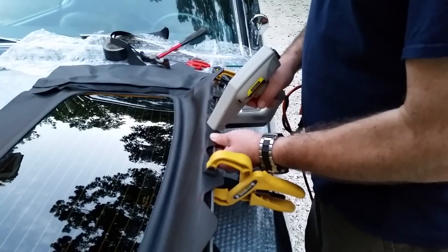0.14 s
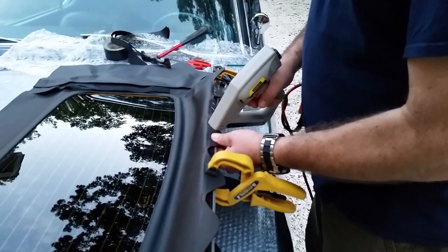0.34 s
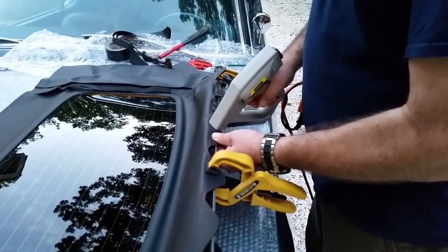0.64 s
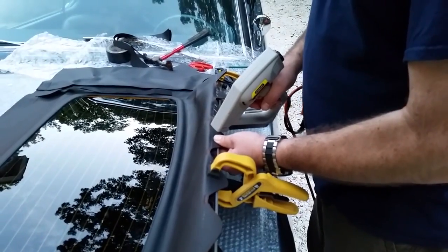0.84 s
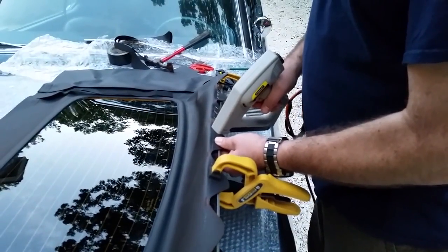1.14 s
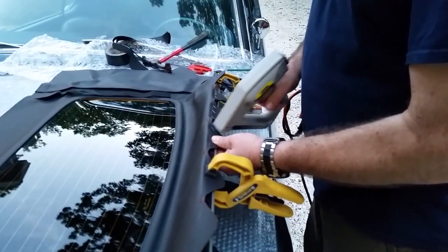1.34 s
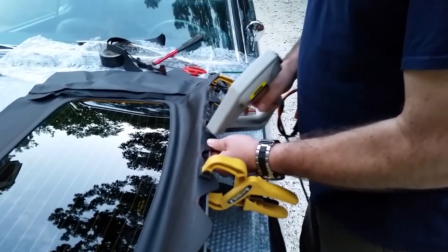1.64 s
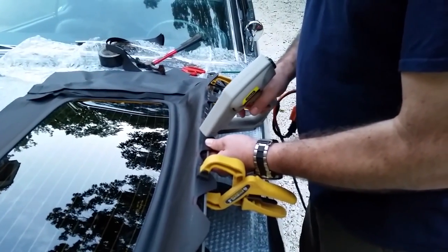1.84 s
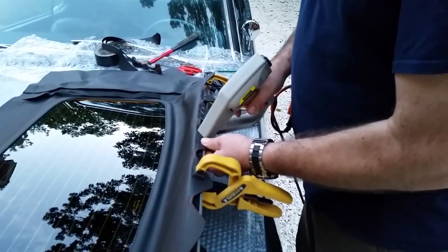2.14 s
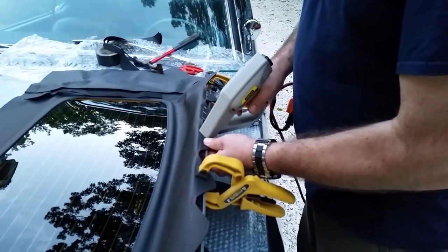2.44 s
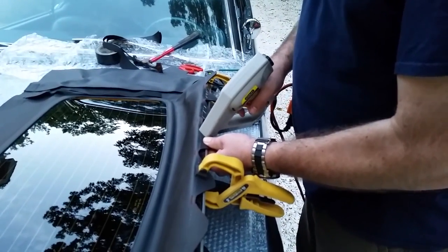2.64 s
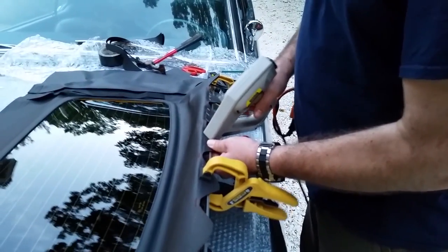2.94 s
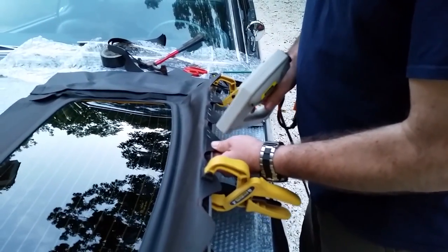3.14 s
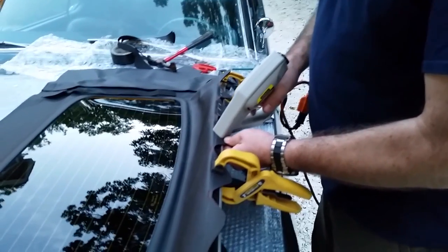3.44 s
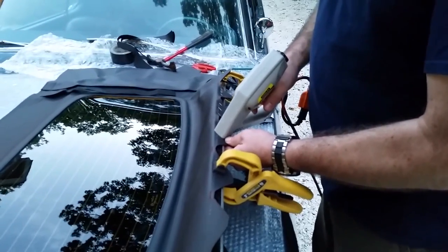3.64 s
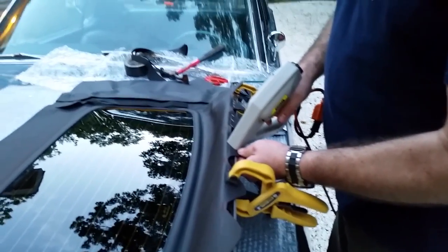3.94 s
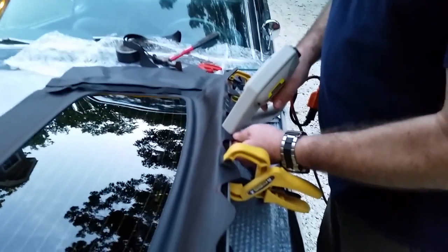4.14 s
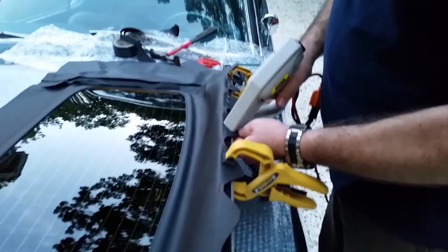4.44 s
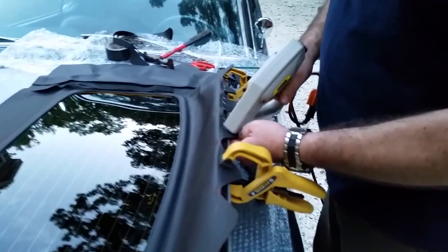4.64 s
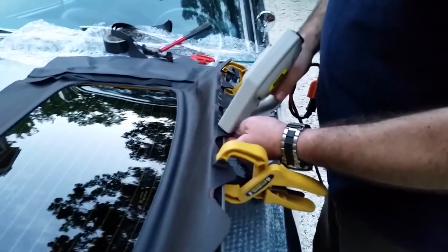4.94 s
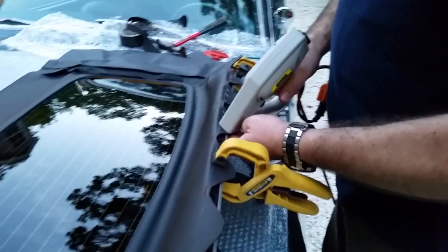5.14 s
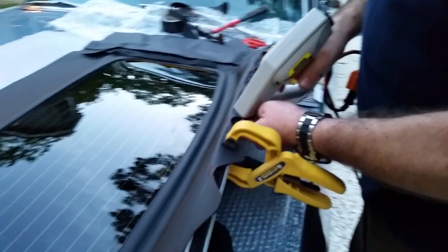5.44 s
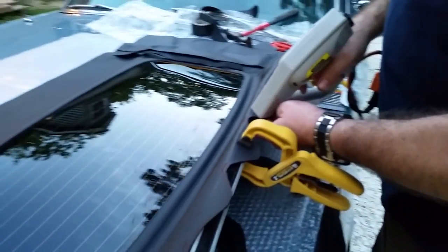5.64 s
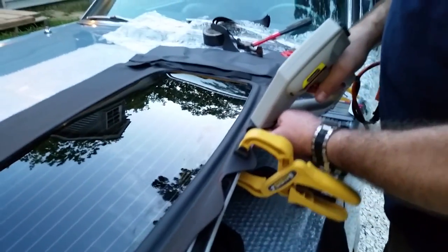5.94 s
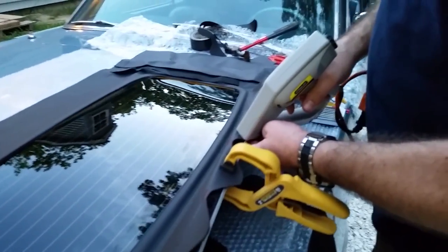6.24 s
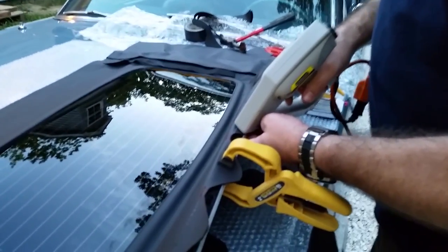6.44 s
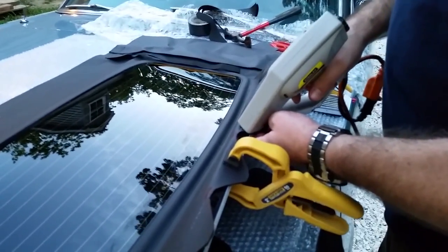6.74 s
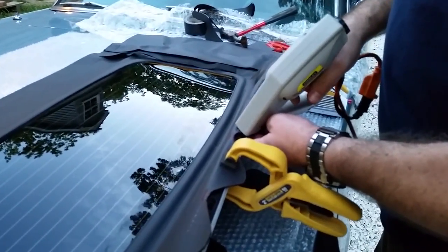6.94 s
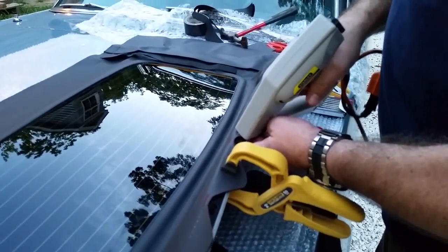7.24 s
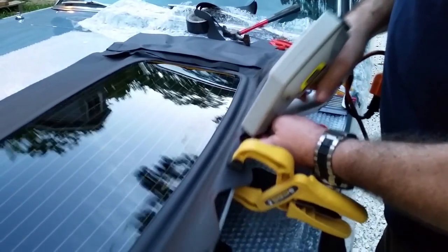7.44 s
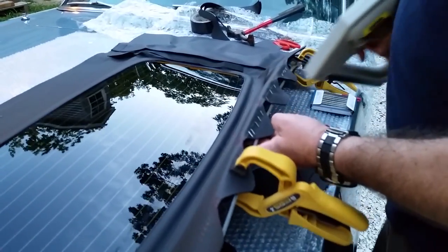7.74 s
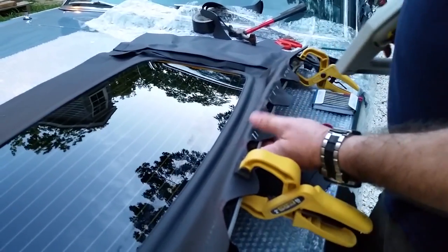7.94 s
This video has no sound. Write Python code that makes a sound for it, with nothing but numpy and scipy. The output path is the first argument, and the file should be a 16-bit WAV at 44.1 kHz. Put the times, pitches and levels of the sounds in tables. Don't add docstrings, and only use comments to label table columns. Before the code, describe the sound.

Small plastic clicks and vinyl rubbing lead into five explosive stapler shots spaced roughly one and a half seconds apart. The first two leave a low hollow panel boom; the later ones are drier and more rattly, the fourth with several rebounds. Faint traffic rumble and a fluttering cricket lie beneath. Close stereo phone sound in open air, distorted peaks, with a noise gate pumping the quiet parts.

```python
import sys
import numpy as np
from scipy import signal
from scipy.fft import rfft, irfft, next_fast_len
from scipy.io import wavfile
from scipy.ndimage import uniform_filter1d

SR = 44100
rng = np.random.default_rng(int(sys.argv[2]) if len(sys.argv) > 2 else 0)


def master_out(mix):
    frames = np.transpose(np.atleast_2d(mix))
    ceiling = np.clip(frames, -1, 1)
    pcm = np.round(ceiling * 32767).astype(np.int16)
    wavfile.write(sys.argv[1], SR, pcm)


def ratio_of_db(decibels):
    return 10 ** (np.asarray(decibels, float) / 20)


N = 357142
T = np.arange(N) / SR


def on_log_hz(table, hz):
    f, v = np.transpose(table)
    return np.interp(np.log(hz), np.log(f), v)


# (frequency [Hz], correlation)
LIKENESS = [(60, 0.18), (300, 0.15), (700, 0.61), (1400, 0.0022), (15000, 0.012)]


def noise(colour, size, like=1.0):
    fast = next_fast_len(size, real=True)
    hz = np.maximum(np.fft.rfftfreq(fast, 1 / SR), 1)
    inside = (hz >= colour[0][0]) & (hz <= colour[-1][0])
    c = np.clip(like * on_log_hz(LIKENESS, hz), 0, .98)
    shape = ratio_of_db(on_log_hz(colour, hz)) * inside
    mid, side = rfft(rng.standard_normal((2, fast))) * shape * np.sqrt([1 + c, 1 - c])
    x = irfft([mid + side, mid - side], fast)[:, :size]
    return x / x.mean(axis=0).std()


def grain(size, hold):
    return uniform_filter1d(np.repeat(rng.standard_normal(size // hold), hold), hold)


def walk(rate):
    k = int(SR / rate)
    return grain(N + k, k)[:N]


def ring(hz, t60, size, rise=.0005):
    t = np.arange(size) / SR
    return np.sin(2 * np.pi * hz * t) * ratio_of_db(-60 * t / t60) * (1 - np.exp(-t / rise))


def lean(db):
    return ratio_of_db(db * np.array([[.5], [-.5]]))


def add(out, s, x):
    i = int(s * SR)
    out[:, i:i + x.shape[-1]] += x[..., :N - i]


# (depth [dB], shutting [s], reopens at [s], opening [s])
GATE = [
    (-22.5, 0.29, 2.29, 0.54),
    (-22.5, 0.2, 3.935, 0.385),
    (-20.5, 0.13, 5.57, 0.41),
    (-16, 0.43, 6.888, 0.49),
    (-18.5, 0.27, 8.5, .3),
]


def gate_db(lag):
    out = 0
    for (s, *_), (depth_db, shutting, reopens, opening) in zip(SHOTS, GATE):
        up = np.clip((T - reopens - lag) / opening, 0, 1)
        shut = 1 - np.exp(-(np.maximum(T - s, 0) / shutting) ** 2)
        out = out + depth_db * shut * (1 + np.cos(np.pi * up)) / 2
    return out


# (time [s], level [dB])
EFFORT = [(0, 6.5), (.13, -2), (1.25, 0), (2.3, -5), (2.9, -1.5), (3.45, 7.5), (3.97, -8.5), (4.12, 6),
          (4.35, 6), (4.9, 6), (5.4, 0.5), (5.65, 6.5), (5.95, 7.5), (6.6, 7.5), (6.95, 5.5), (7.2, 6),
          (7.42, 10), (8.09, 7.5)]


def gated(mix, colours, flicker_db, rate):
    effort = np.interp(T, *np.transpose(EFFORT))
    layers = []
    for (db, gate, work, lag), colour, f, r in zip(mix, colours, flicker_db, rate):
        level_db = db + gate * gate_db(lag) + work * effort + f * walk(r)
        layers.append(noise(colour, N) * ratio_of_db(level_db))
    return layers


# (frequency [Hz], level [dB per Hz])
RUMBLE = [(12, -39.5), (20, -7), (27, -7.5), (108, -4), (236, -15), (260, -21), (340, -50), (570, -120)]
ROAD = [(290, -41.5), (500, -8), (590, -7), (770, 2), (960, 1.5), (1500, -17.5), (1950, -59), (3300, -120)]
INSECTS = [(3300, -30.5), (3800, -6), (4300, -2.5), (4600, -4), (5300, -22.5), (6100, -19), (6900, -21),
           (7300, -46)]
# (level with the gate open [dB], share of gate depth, share of effort, reopening lag [s])
YARD_MIX = [
    (-53.5, 0.53, 0.6, -0.084),
    (-60.5, 0.8, 0.82, -0.058),
    (-67.5, 1.12, .01, -0.011),
    (-76.5, 0.71, .01, -0.019),
]


def yard():
    return sum(gated(YARD_MIX[:3], [RUMBLE, ROAD, INSECTS], flicker_db=[1.5, 1.0, 1.0], rate=[14, 25, 60]))


# (frequency [Hz], level [dB per Hz])
CRICKET = [(1, 1.5), (60, -3), (130, -7.5), (400, -27.5)]
# (time [s], pitch [Hz])
CRICKET_HZ = [(0.0, 4640), (0.4, 4540), (0.61, 4790), (0.9, 4670), (4.8, 4650), (4.87, 4780), (5.41, 4620),
              (6.08, 4740), (6.81, 4570), (7.12, 4810), (7.46, 4590), (7.55, 4900), (7.8, 4670),
              (8.09, 4670)]
# (middle [s], half length [s], swell [dB])
PHRASES = [(0, .1, 13.5), (0.821, .32, 13), (2.42, 0.22, 11), (2.825, 0.11, 2), (3.797, 0.24, 7),
           (4.492, 0.21, 6.5), (5.686, .15, 11.5), (5.98, 0.14, 12.5), (7.083, .08, 8.5), (7.346, 0.096, 6),
           (7.78, 0.065, 6)]


def cricket():
    flutter = gated(YARD_MIX[3:], [CRICKET], flicker_db=[1.5], rate=[150])[0]
    hz = np.interp(T, *np.transpose(CRICKET_HZ))
    swell_db = sum(db * np.exp(-((T - s) / half) ** 2) for s, half, db in PHRASES)
    return flutter * 1.7 * np.cos(2 * np.pi * np.cumsum(hz) / SR) * ratio_of_db(swell_db)


# (frequency [Hz], level [dB per Hz])
THRUM = [(200, -12), (260, 0), (450, -7), (600, -22)]
CREAK = [(1250, -15), (1600, -1.5), (2400, -2), (3400, -12.5), (3900, -31)]
HISS = [(7000, -26), (7700, -1.5), (8300, -1.5), (10300, -3.5), (11000, -25)]
TOP_HISS = [(10000, -36), (10800, -9), (12100, 2), (14000, -0.5), (14700, -4.5)]
# (level with the gate open [dB], share of gate depth, share of effort, reopening lag [s])
RUB_MIX = [
    (-66.5, 0.85, 0.63, -0.12),
    (-77.5, 0.71, 1, 0.089),
    (-97, 0.0093, 0.43, .01),
    (-84.5, 0.49, .3, .12),
]


def rubbing():
    return sum(gated(RUB_MIX, [THRUM, CREAK, HISS, TOP_HISS], flicker_db=[1.5, 1.0, 1.5, 1.0],
                     rate=[30, 60, 70, 60]))


# (frequency [Hz], level [dB per Hz])
FLOOR = [(12, -28.5), (20, -7), (43, -6.5), (127, -5), (426, -31.5), (872, -21.5), (1210, -38),
         (4080, -38.5), (14500, -43.5)]


def floor():
    return noise(FLOOR, N) * ratio_of_db(-75)


# (middle [s], half length [s], from [Hz], to [Hz], level [dB])
SCUFFS = [
    (0.018, 0.028, 6500, 6750, -59),
    (4.107, 0.084, 490, 2210, -66),
    (4.198, 0.044, 507, 3420, -51.5),
    (4.202, 0.037, 1940, 2680, -56.5),
    (4.196, 0.038, 12300, 14540, -64),
    (5.079, 0.02, 491, 1600, -69),
    (5.087, 0.023, 8330, 14850, -67.5),
    (5.157, 0.021, 757, 1060, -55),
    (5.159, 0.026, 8000, 14800, -75),
]
# (middle [s], half length [s], from [Hz], to [Hz], level [dB])
PALM = [(0.005, 0.073, 11000, 14600, -74), (0.855, .21, 14000, 14400, -85),
        (1.136, 0.094, 1650, 3120, -72.5), (1.145, .085, 11200, 14730, -76.5),
        (2.405, 0.22, 41.8, 153, -58.5), (2.902, 0.14, 11400, 14450, -83), (3.44, 0.0046, 245, 756, -62),
        (3.579, 0.085, 224, 620, -67), (3.997, 0.083, 61.2, 254, -49.5), (4.074, 0.077, 240, 900, -54),
        (4.135, 0.12, 12400, 14680, -76.5), (4.236, 0.042, 231, 500, -45.5),
        (4.273, 0.092, 1549, 2852, -67.5), (4.32, 0.11, 12100, 14760, -76.5),
        (4.524, 0.089, 11620, 14600, -75), (5.161, 0.035, 286.7, 610, -69),
        (5.779, 0.12, 11150, 14600, -74), (5.781, 0.13, 7680, 10400, -84), (5.962, .085, 10900, 14600, -74),
        (5.977, 0.082, 1520, 3064, -69), (6.363, 0.13, 1233, 2690, -68), (5.927, 0.061, 6300, 10000, -79),
        (6.603, 0.023, 297, 1200, -58), (6.636, 0.014, 397, 1500, -58.5), (7.27, .12, 1305, 2900, -70.5),
        (7.23, 0.18, 910, 1160, -59.5), (6.477, 0.15, 7690, 10500, -85), (7.387, .065, 10760, 14700, -76),
        (7.394, 0.06, 1250, 3050, -66), (7.763, 0.11, 9300, 14400, -76.5)]


def scuffs():
    out, t = np.zeros((2, N)), np.arange(-12288, 12288) / SR
    for s, half, low_hz, high_hz, db in list(SCUFFS) + list(PALM):
        band = [(.8 * low_hz, -25), (low_hz, 0), (high_hz, -9), (1.4 * high_hz, -35)]
        level_db = db - 0.5 + 3.4 * grain(len(t), 128)
        swell = noise(band, len(t)) * np.exp(-(t / half) ** 2.0) * ratio_of_db(level_db)
        skip = max(int(-(s + t[0]) * SR) + 1, 0)
        add(out, s + t[skip], swell[:, skip:])
    return out


# (time [s], level [dB], pitch [Hz])
BUMPS = [(0.008, -36.5, 83), (0.92, -44, 165), (1.917, -45, 104), (1.962, -50, 94), (2.257, -66.5, 107),
         (2.358, -66, 125), (2.46, -50, 109), (2.568, -48, 163), (3.44, -45.5, 81.5), (3.6, -42, 99),
         (3.959, -46, 102.2), (4.237, -29.5, 145), (5.206, -52, 95), (5.662, -52, 119.7), (7.304, -33, 103)]


def bumps():
    out = np.zeros((2, N))
    for s, db, hz in BUMPS:
        thud = ring(hz, 4.5 / hz, 4096, rise=.002) + .4 * ring(3.5 * hz, .02, 4096, rise=.002)
        add(out, s, ratio_of_db(db + 5.5) * thud)
    return out


# (time [s], level [dB], ring [Hz], knock [dB], sizzle [dB])
TICKS = [(0.0478, -49, 2500, -40.5, -58), (0.461, -56, 1000, -55, -85), (1.069, -51, 2450, -52, -78),
         (1.1125, -39.5, 2520, -44, -41), (1.9619, -59, 2500, -65, -87), (2.7344, -94, 4154, -69, -59.5),
         (3.5748, -62.5, 2510, -74, -65), (4.2508, -37, 3600, -40, -38), (4.178, -50, 1420, -38, -72),
         (4.238, -30.5, 790, -64, -70), (4.2994, -55, 4720, -52, -62), (4.3994, -59, 4716, -51, -66),
         (5.0695, -55, 1000, -72, -75), (5.183, -60, 1206, -70.5, -78), (5.5815, -62.5, 2000, -50, -53.5),
         (5.6444, -80, 4700, -57, -62), (5.66, -72, 1500, -50, -70), (5.7009, -71, 4760, -40, -67),
         (5.8082, -50, 1536, -34.5, -50.5), (5.8661, -63, 4700, -41, -62), (5.9204, -51.5, 1420, -35, -59),
         (6.6266, -57, 2500, -25.5, -50), (6.8723, -59.5, 2540, -48, -76), (7.272, -44, 996, -43, -77.5),
         (7.6864, -54, 1906, -74, -45.5)]
TRIGGER = [(1.233, -53.5, 4413, -60.5, -58), (2.919, -54, 3050, -66, -63), (2.938, -42, 2780, -52, -39.5),
           (2.955, -55, 1582, -58, -60.5), (4.497, -60, 4500, -53.5, -59.5), (4.514, -50, 2436, -57.5, -53),
           (4.529, -40.5, 4060, -50.5, -39), (6.009, -34, 2900, -43.5, -32), (6.021, -47.5, 4000, -46, -42),
           (7.3936, -41, 1990, -34.5, -55.5), (7.4112, -36.5, 4440, -48.5, -38)]
# (pitch [Hz], t60 [s], level [dB])
KNOCK = [
    (950, 0.011, 2),
    (620, 0.0079, -2.5),
    (378, 0.011, -10),
    (1250, 0.0078, -5.5),
    (2500, 0.0055, -28),
]
# (frequency [Hz], level [dB per Hz])
SIZZLE = [(2500, -22.5), (4000, -12.5), (6500, -15), (8000, -11), (10800, 0.5), (14300, -0.5),
          (15600, -22.5)]


def ticks():
    out, t = np.zeros((2, N)), np.arange(2048) / SR
    for s, db, hz, knock_db, sizzle_db in list(TICKS) + list(TRIGGER):
        around_hz = [(.3 * hz, -20), (.6 * hz, 0), (1.3 * hz, -3), (2.2 * hz, -22)]
        snap = ring(hz, .010, len(t), rise=.0003) + .45 * noise(around_hz, len(t)) * np.exp(-t / .0016)
        knock = sum(ratio_of_db(d) * ring(f, t60, len(t), rise=0.0017) for f, t60, d in KNOCK)
        fade = 1.7 * np.exp(-t / .0008) + .06 * np.exp(-t / .008)
        sizzle = noise(SIZZLE, len(t)) * fade * ratio_of_db(sizzle_db - 2.5)
        add(out, s, ratio_of_db(db + 3.5) * snap + ratio_of_db(knock_db + 8.0) * knock + sizzle)
    return out


def whine():
    since, half_s = T - .74, 0.28
    hz = 9340 - 900 * since + 90 * walk(200)
    swell = np.exp(-(since / half_s) ** 2) * ratio_of_db(-89.5 + 3.0 * walk(81))
    return np.sin(2 * np.pi * np.cumsum(hz) / SR) * swell


# (time [s], level [dB], pitch [Hz])
CRACKLES = [(1.132, -59, 2500), (1.195, -66.5, 11700), (5.078, -61, 11800), (5.098, -59, 12000),
            (5.142, -62, 11800), (5.17, -70, 11600), (5.324, -79, 11200), (5.568, -66, 1500),
            (5.62, -67, 1500), (5.67, -71, 12500), (5.693, -65, 12000), (5.738, -65, 11500),
            (5.77, -63, 12500), (5.825, -61, 12000), (5.851, -62, 12500), (5.985, -55, 2500),
            (5.992, -61, 11000)]


def crackles():
    out, t = np.zeros((2, N)), np.arange(1024) / SR
    for s, db, hz in CRACKLES:
        band = [(.75 * hz, -24), (1.0 * hz, 0), (0.87 * hz, 0), (1.3 * hz, -24)]
        add(out, s, ratio_of_db(db + 4) * noise(band, len(t)) * np.exp(-t / .0012))
    return out


def pull_in():
    return ring(930, 0.0087, 4096) + .5 * ring(2100, 0.0089, 4096)


# (frequency [Hz], level [dB per Hz])
CRASH = [(180, -32.5), (300, -7.5), (923, -4), (2700, -9), (3290, -11.5), (4580, -5), (5590, -12.5),
         (7040, -18.5), (9640, -9.5), (10800, -0.5), (12800, -6.5), (14300, -4), (15600, -24.5)]


def crash(fade_ms):
    u = np.arange(4096) / SR - .008
    rise = np.exp(-(u / .0018) ** 2) + .25 * np.exp(-(u / .0036) ** 4) + .03 * np.exp(-(u / .007) ** 4)
    stroke = np.where(u < 0, rise, 1.2 * np.exp(-(u / fade_ms * 800) ** 1.1))
    clack = noise(CRASH[:-5], len(u)) * lean(-4)
    zing = ratio_of_db(1) * noise(CRASH[-6:], len(u))
    return (clack + zing) * stroke


def nose_and_blade(nose_hz, nose_db, blade_hz, blade_db):
    t60 = 0.021
    nose = ratio_of_db(nose_db) * ring(nose_hz, t60, 4096, rise=0.0011) * np.array([[.7], [1]])
    blade = ratio_of_db(blade_db) * ring(blade_hz, t60, 4096, rise=0.00096) * np.array([[.6], [1.2]])
    return nose + blade


def shell():
    return ring(500, 0.018, 4096) * np.array([[.6], [1]])


# (frequency [Hz], level [dB per Hz])
THUMP = [(200, -20.5), (280, 0.5), (480, -2), (750, -3), (1100, -20)]


def thump():
    t = np.arange(4096) / SR
    return noise(THUMP, len(t)) * ratio_of_db(-60 * t / 0.15) * (1 - np.exp(-t / 0.0089))


def kick(hz, size):
    turn = np.clip(np.arange(2048) / SR * hz, 0, 1)
    return size * np.sin(2 * np.pi * turn ** .72) * np.exp(-turn) * (1 - np.exp(-turn / .04))


# (frequency [Hz], level [dB per Hz])
RATTLE = [(35, -32.5), (60, -7), (144, -8), (282, -15.5), (372, -19.5), (539, -20.5), (855, -2),
          (1600, -13.5), (2530, -15), (3270, -21.5), (4840, -19), (5180, -19.5), (11900, -10), (14000, -16),
          (15000, -25.5)]
# (frequency [Hz], t60 [s])
RATTLE_T60 = [(100, 0.46), (400, 0.66), (1000, 0.15), (3000, 0.72), (7000, 0.66), (12000, 0.72)]


def rattle():
    size = 32768
    t = np.arange(size) / SR
    x = rfft(noise(RATTLE, size, like=0.84))
    hz = np.maximum(np.fft.rfftfreq(size, 1 / SR), 1)
    out = 0
    for centre in 60 * 2 ** np.arange(9):
        bright = centre > 5000
        share = np.clip(1 - abs(np.log2(hz / centre)), 0, 1)
        fade_db = -60 * t / on_log_hz(RATTLE_T60, centre) - 1.2 * bright
        fade_db = fade_db - (60 + 75 * bright) * t ** 2
        out = out + irfft(x * share, size) * ratio_of_db(fade_db + 6 + 2.5 * grain(size, 256))
    stutter = ratio_of_db(1.7 * grain(size, 64) + 2.0 * grain(size, 512))
    start = (1 - np.exp(-(t / 0.0024) ** 2)) * (1 - 0.55 * np.exp(-(t / .02) ** 2))
    return out * stutter * start


# (pitch [Hz], t60 [s], level [dB])
PANEL = [
    (116.6, 0.54, 0),
    (166.5, 0.63, -3.5),
    (208, 0.82, -11),
    (332, 0.6, -12.5),
    (383, 0.45, -11.5),
    (471, 0.5, -13),
]


def boom(upper_db):
    size, out = 32768, 0
    for f, t60, db in PANEL:
        level_db = db - 3.5 + upper_db * (f > 250) + 3.7 * grain(size, 1024)
        for a, b in rng.standard_normal((6, 2)):
            tone = ring(f * (1 + 0.067 * b), t60 * (130 / f) ** 0.43, size, rise=0.027)
            out = out + ratio_of_db(level_db + 2.6 * a) * tone
    return out * np.exp(-(np.arange(size) / SR / .42) ** 3)


# (peak time [s], crash [dB], crash fade [ms], rattle [dB], panel boom [dB])
SHOTS = [
    (1.274, -10, 1.7, -35, -26.5),
    (2.9894, -9.5, 2.8, -33, -21.5),
    (4.556, -6, 2.4, -33, -50),
    (6.0391, -6, 3.1, -27.5, -39),
    (7.4397, -7.5, 2.9, -32.5, -60.5),
]
# (lag [ms], size, pitch [Hz])
KICKS = [
    [(-1.7, 0.7, 305), (-0.7, 0.56, 100)],
    [(-0.7, -0.04, 360), (-1.6, -0.55, 175)],
    [(-0.94, -0.36, 87), (-2.5, -0.2, 70)],
    [(-0.5, -0.4, 380), (1.88, 0.85, 150)],
    [(-0.2, -0.55, 260), (1.2, 0.45, 130)],
]
# (nose [Hz], nose [dB], blade [Hz], blade [dB], upper roof modes [dB])
RINGS = [
    (620, -6.5, 4400, -19, 4.5),
    (1310, -9.5, 4390, -11, 4),
    (865, -7.5, 4700, -11, -0.5),
    (700, -13, 3800, -11.5, 0),
    (942, -4.5, 6100, -16, -3),
]
# (crash lag [ms], nose lag [ms], shell [dB], door-skin thump [dB])
BLOWS = [
    (-.8, 0, -20.5, -38),
    (.3, 0.18, -20, -35),
    (1.0, 0.028, -12, -33.5),
    (1.3, 2.0, -19.5, -31),
    (0.029, 1.0, -19, -40.5),
]


def gun():
    out = np.zeros((2, N))
    for shot, kicks, rings, blow in zip(SHOTS, KICKS, RINGS, BLOWS):
        s, db, fade_ms, rattle_db, boom_db = shot
        *nose_blade, upper_db = rings
        crash_ms, nose_ms, shell_db, thump_db = blow
        add(out, s - .008 + crash_ms / 1000, crash(fade_ms) * ratio_of_db(db - 7))
        add(out, s - 0.0062, ratio_of_db(db - 23.5 + 9.5) * pull_in())
        add(out, s - .002 + nose_ms / 1000, nose_and_blade(*nose_blade))
        add(out, s - .001, ratio_of_db(shell_db) * shell())
        add(out, s, ratio_of_db(thump_db) * thump())
        for side, (lag_ms, size, hz) in zip(np.eye(2)[:, :, None], kicks):
            add(out, s + lag_ms / 1000, side * kick(hz, size))
        add(out, s, rattle() * ratio_of_db(rattle_db))
        add(out, s + 0.02, boom(upper_db) * ratio_of_db(boom_db - 5.5) * np.array([[.9], [1.1]]))
    return out


# (time [s], level [dB], knock [Hz], clatter [dB], left minus right [dB])
REBOUNDS = [
    (1.299, -18, 813, -21.5, -0.5),
    (3.0155, -18, 895, -19.5, -5.5),
    (4.5793, -19, 942, -20, -3.5),
    (6.046, -17, 780, -30, -3.5),
    (6.0604, -15, 1022, -22.5, -4.5),
    (6.08, -28.5, 1295, -30.5, 3.5),
    (7.459, -19, 746, -20, -7),
]
CLATTER_LAG_MS = [-4, -3.0, 0.5, 2.5, 1.5, -1.5, 0]


def rebounds():
    out, t = np.zeros((2, N)), np.arange(4096) / SR
    for (s, db, hz, clatter_db, lean_db), lag_ms in zip(REBOUNDS, CLATTER_LAG_MS):
        knock = ring(hz, .012, len(t)) + .5 * ring(.72 * hz, .012, len(t))
        knock = knock + .55 * ring(1.45 * hz, .011, len(t)) + .35 * ring(2.7 * hz, .01, len(t))
        add(out, s, ratio_of_db(db + 7.0) * lean(lean_db) * knock)
        swell = (t / .005) ** 2 * np.exp(2 - 2 * t / .005)
        scrape = noise(CRASH[-6:], len(t)) + 0.79 * noise(CRASH[1:8], len(t))
        add(out, s - .003 + lag_ms / 1000, scrape * swell * ratio_of_db(clatter_db - 5.0))
    return out


# (time [s], level [dB], pitch [Hz])
AFTERKNOCKS = [(1.321, -30, 420), (1.343, -32, 600), (3.045, -36.5, 400), (3.313, -61.5, 716),
               (4.604, -34, 900), (4.739, -43, 851), (6.125, -44, 900), (6.18, -38.5, 800),
               (6.293, -47, 697), (7.49, -37, 1000), (7.624, -42, 1150), (7.642, -44, 1000),
               (7.766, -52, 891)]


def afterknocks():
    out = np.zeros((2, N))
    for s, db, hz in AFTERKNOCKS:
        knock = ring(hz, .014, 1024, rise=.001) + .5 * ring(1.6 * hz, .009, 1024, rise=.001)
        add(out, s, ratio_of_db(db + 5) * knock)
    return out


DUCKS_DB = [
    -22,
    -2.5,
    -23,
    -3.5,
    -16,
]


def duck_db():
    return sum(db * np.exp(-((T - s + .012) / .005) ** 4) for (s, *_), db in zip(SHOTS, DUCKS_DB))


def scene():
    around = yard() + cricket() + rubbing() + floor() + scuffs() + bumps() + ticks() + whine()
    return around * ratio_of_db(duck_db()) + crackles() + gun() + rebounds() + afterknocks()


# (frame level [dB], limit under it [dB])
MASK_DB = [
    (-100, -40),
    (-72, -28.5),
    (-63, -20.5),
]
# from, to [Hz]
MASK_HZ = (5100, 9200)


def thin_out(x):
    hz, _, z = signal.stft(x, SR, nperseg=1024)
    power = (abs(z) ** 2).sum(axis=0)
    power = uniform_filter1d(uniform_filter1d(power, size=4, axis=0), size=3, axis=1)
    frame_db = 10 * np.log10(power[(hz > 500) & (hz < 5000)].mean(axis=0) + 1e-18)
    limit = ratio_of_db(2 * (frame_db + np.interp(frame_db, *np.transpose(MASK_DB))))
    weak = (power < limit) & ((hz > MASK_HZ[0]) & (hz < MASK_HZ[1]))[:, None]
    fading = (frame_db > -84) & (frame_db < np.roll(frame_db, 6) - 5) & (frame_db < -52)
    dip = (power < .58 * uniform_filter1d(power, size=24, axis=0)) & fading
    dip = dip & ((hz > 3600) & (hz < 7400))[:, None]
    dip = uniform_filter1d(uniform_filter1d(1. * dip, size=5, axis=1), size=3, axis=0) > .12
    return x - signal.istft(z * (weak | dip), SR, nperseg=1024)[1][:, :N]


def top_cut(x):
    return signal.sosfilt(signal.butter(12, 15710, fs=SR, output="sos"), x)


# (frequency [Hz], left minus right [dB])
LEAN = [(60, 3), (110, -1), (200, -1.5), (380, 0), (700, 4.5), (1290, 1), (2380, 2.5), (4400, 3),
        (8120, 6.5), (15000, -5.5)]
# (frequency [Hz], width [Hz], level [dB])
PORT_DIPS = [
    (5730, 530, -14),
    (8000, 60, -17.5),
]


def record(dry):
    size = next_fast_len(N, real=True)
    hz = np.maximum(np.fft.rfftfreq(size, 1 / SR), 1)
    dips_db = np.array([db / (1 + ((hz - f) / w) ** 2) for f, w, db in PORT_DIPS])
    top_db = -25 * (1 + np.tanh((hz - 14800) / 130))
    bass_db = -10 * np.log10(1 + (32 / hz) ** 2)
    colour = lean(on_log_hz(LEAN, hz)) * ratio_of_db(dips_db + top_db + bass_db)
    wet = irfft(rfft(dry, size) * colour, size)[:, :N]
    return top_cut(thin_out(np.clip(wet, -.97, .97)))


dry = scene()
out = record(dry)
master_out(out)
```